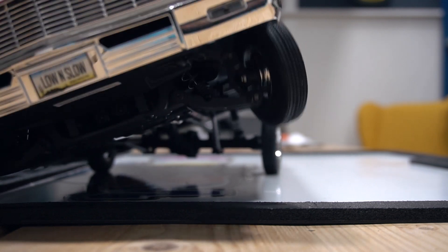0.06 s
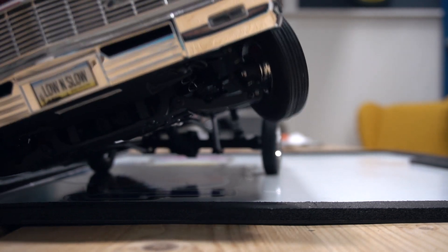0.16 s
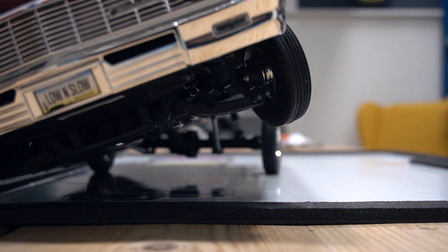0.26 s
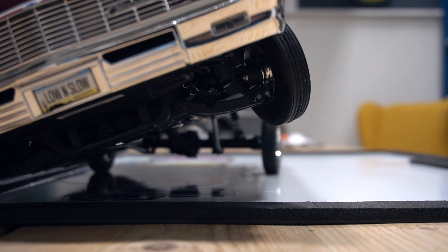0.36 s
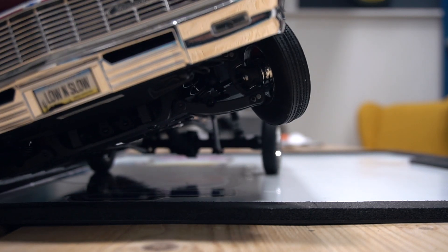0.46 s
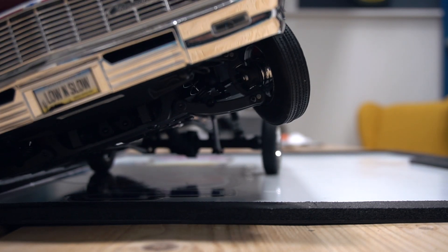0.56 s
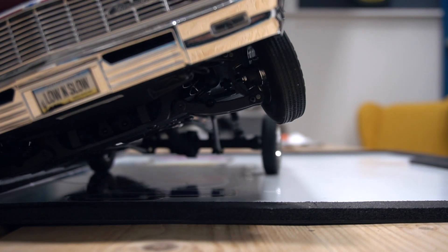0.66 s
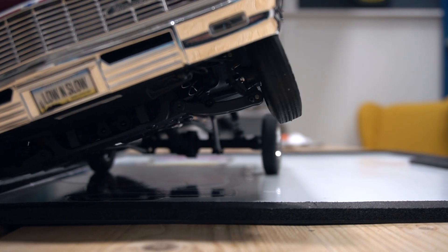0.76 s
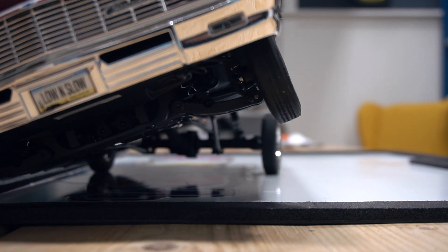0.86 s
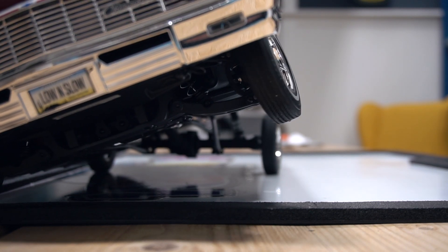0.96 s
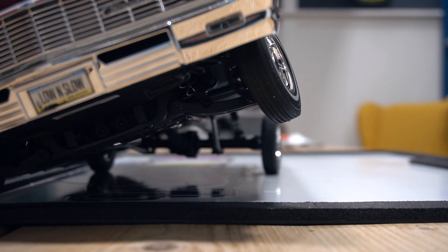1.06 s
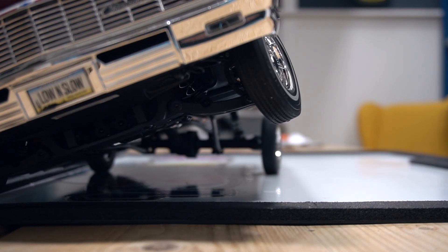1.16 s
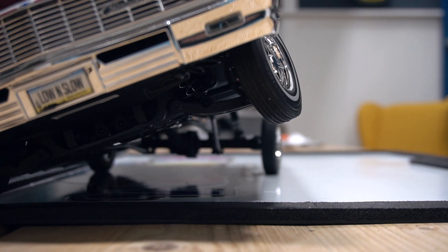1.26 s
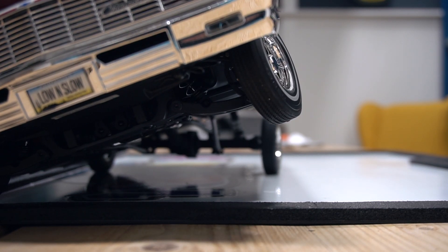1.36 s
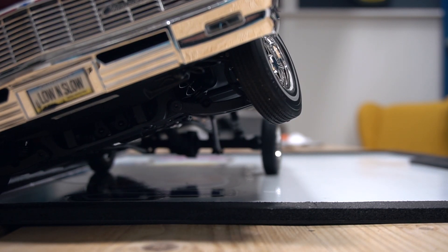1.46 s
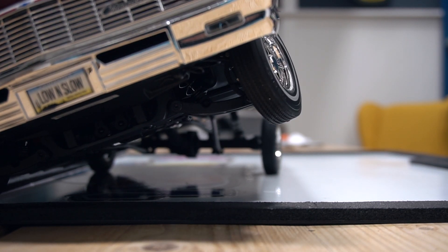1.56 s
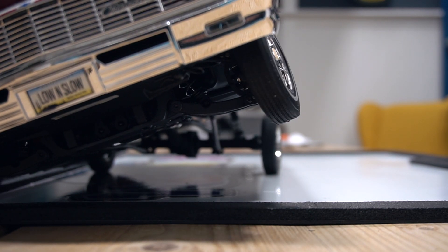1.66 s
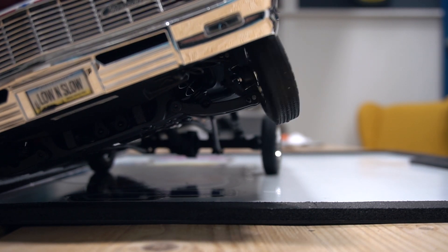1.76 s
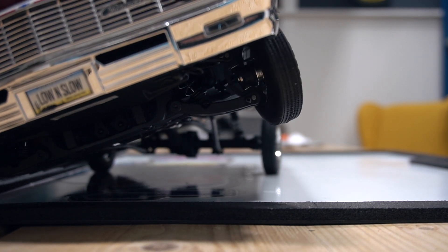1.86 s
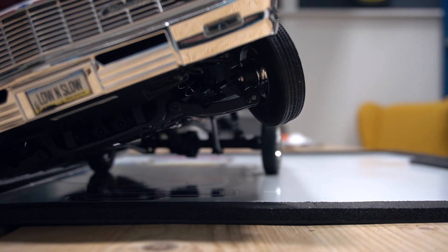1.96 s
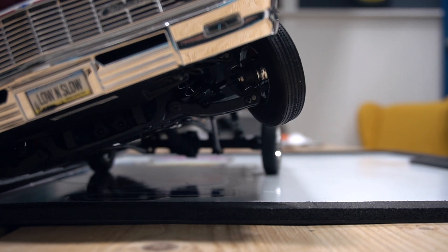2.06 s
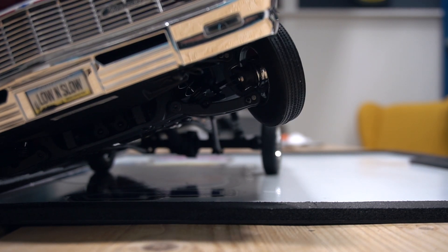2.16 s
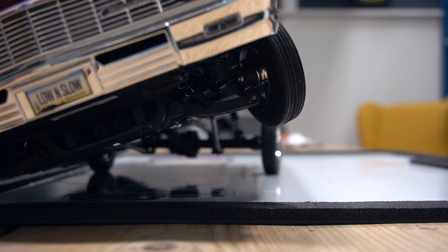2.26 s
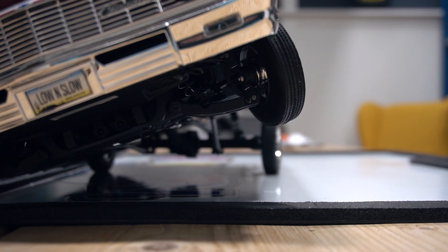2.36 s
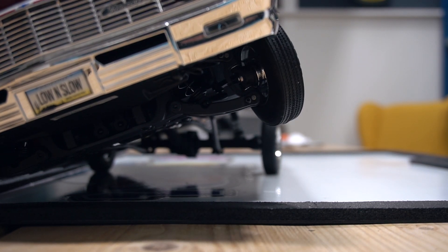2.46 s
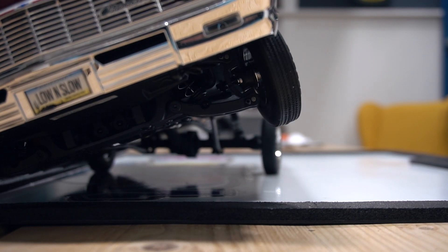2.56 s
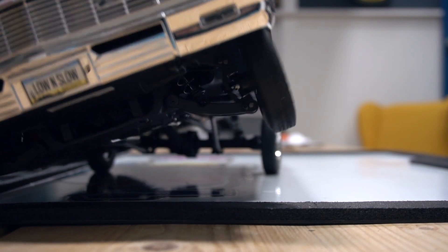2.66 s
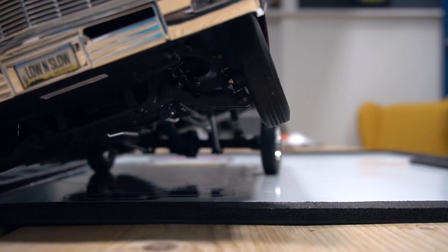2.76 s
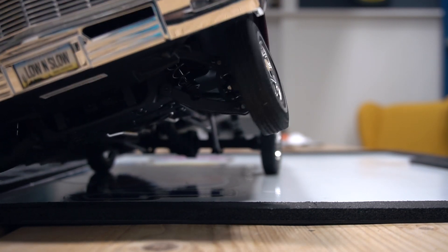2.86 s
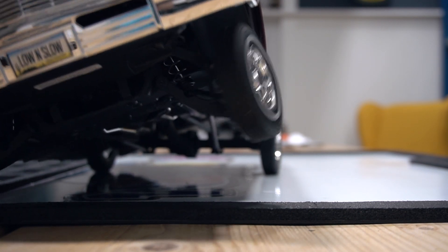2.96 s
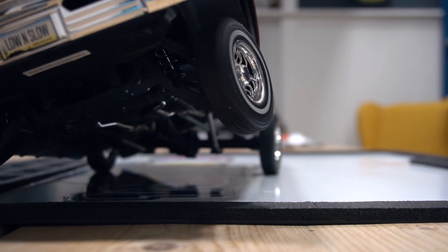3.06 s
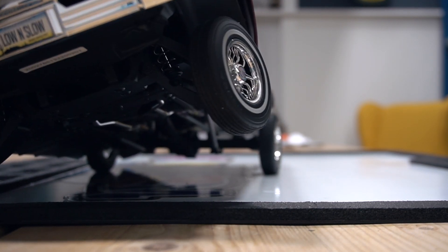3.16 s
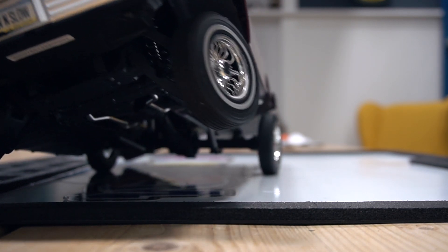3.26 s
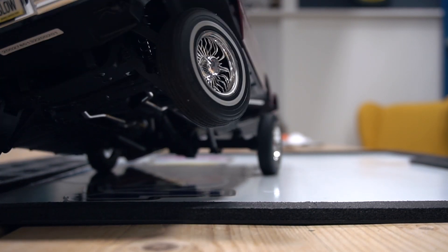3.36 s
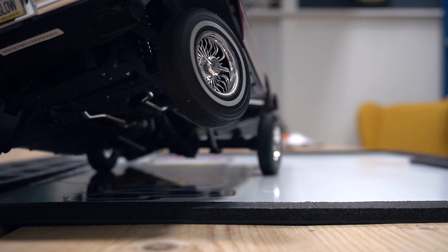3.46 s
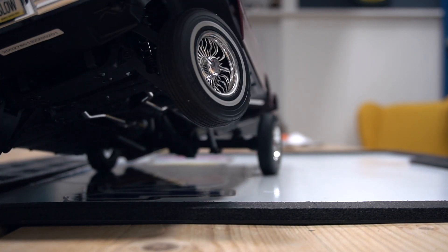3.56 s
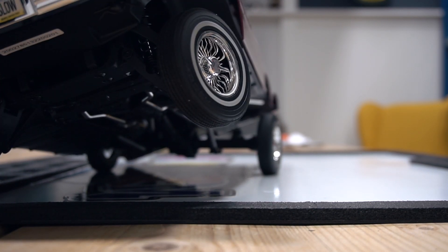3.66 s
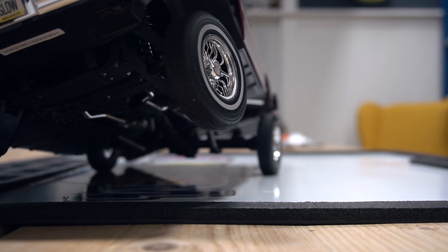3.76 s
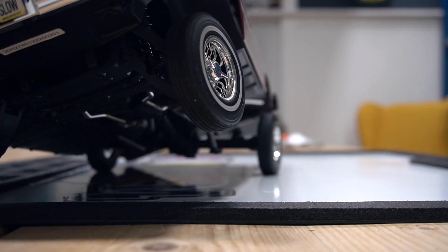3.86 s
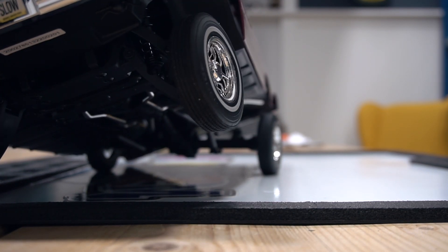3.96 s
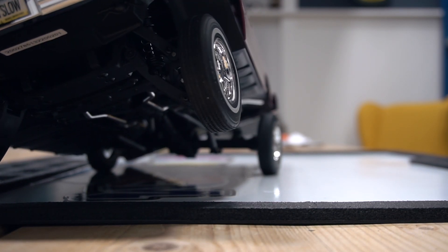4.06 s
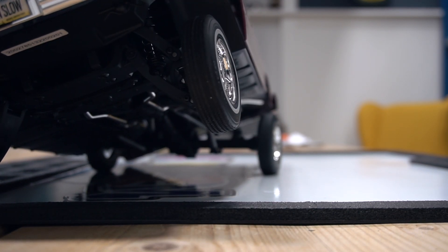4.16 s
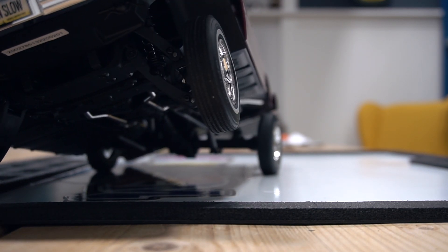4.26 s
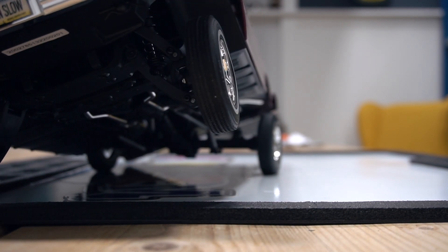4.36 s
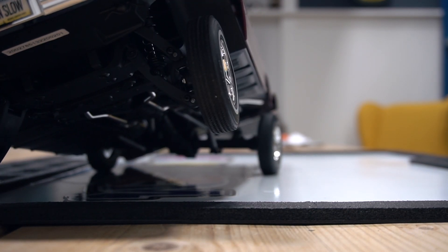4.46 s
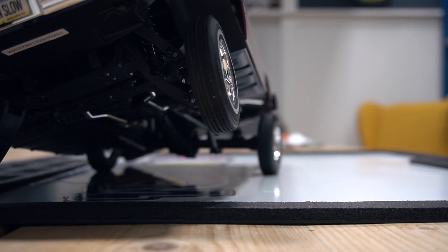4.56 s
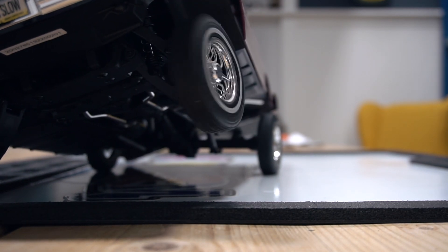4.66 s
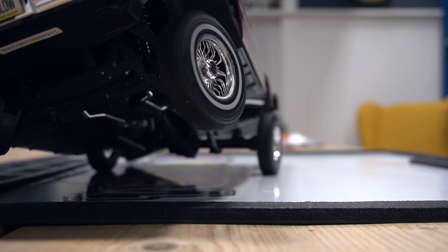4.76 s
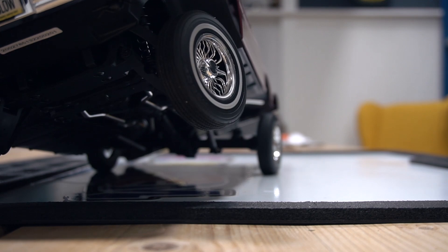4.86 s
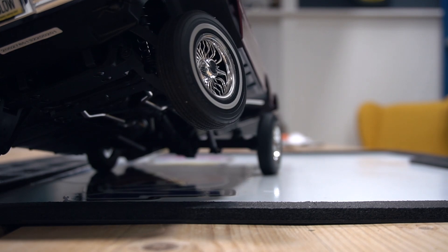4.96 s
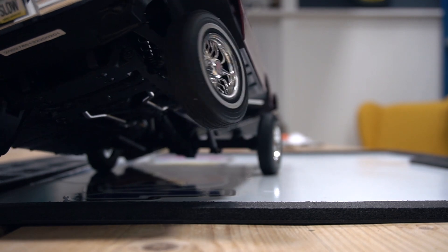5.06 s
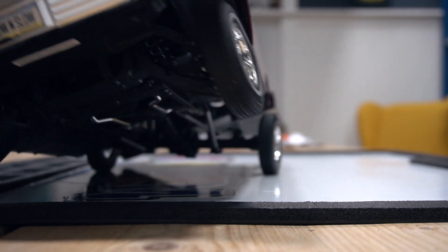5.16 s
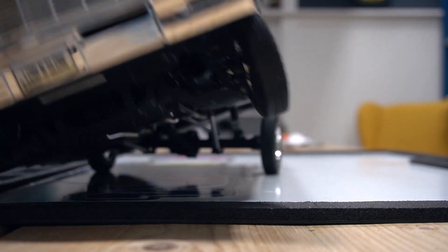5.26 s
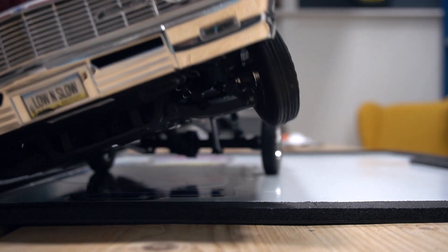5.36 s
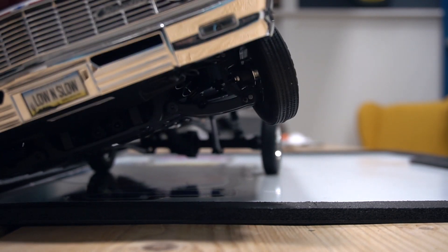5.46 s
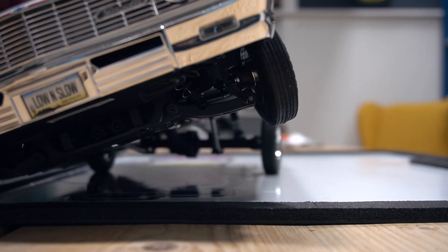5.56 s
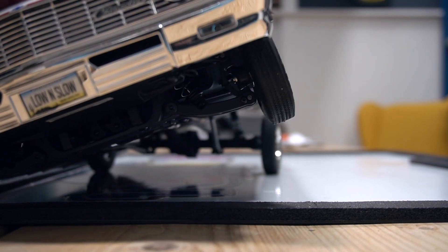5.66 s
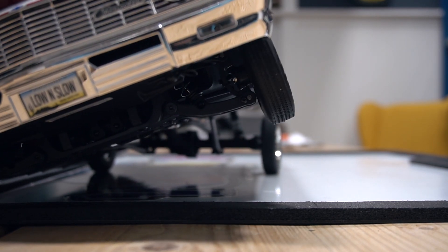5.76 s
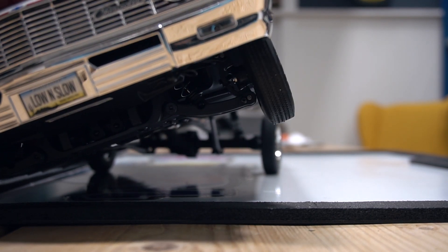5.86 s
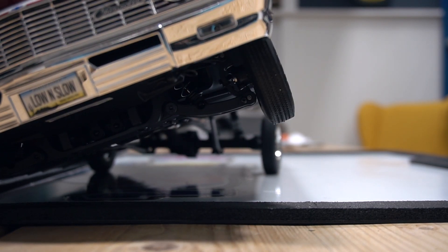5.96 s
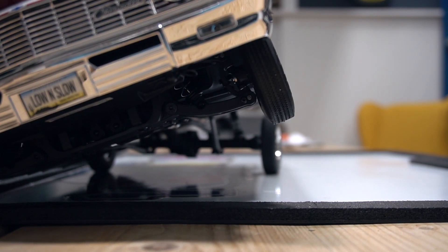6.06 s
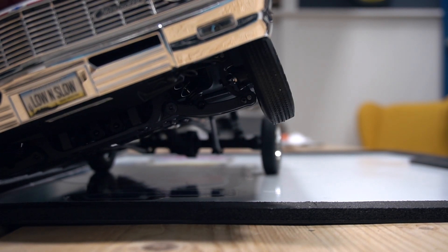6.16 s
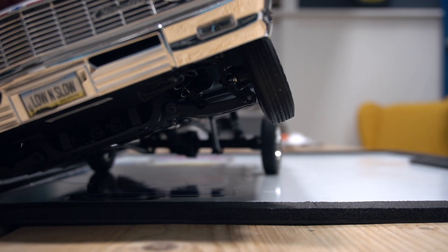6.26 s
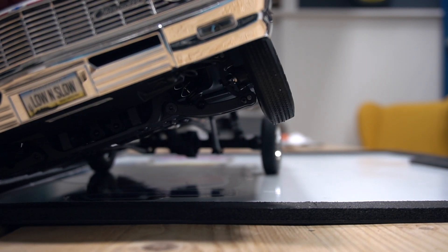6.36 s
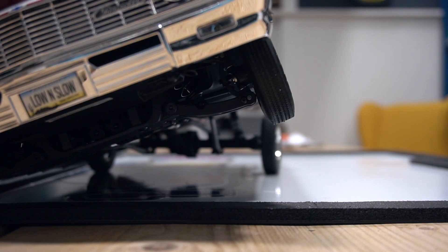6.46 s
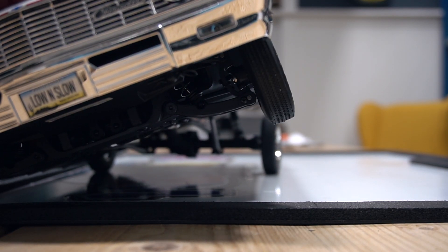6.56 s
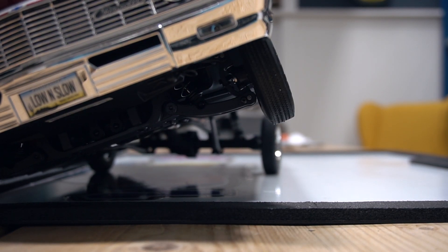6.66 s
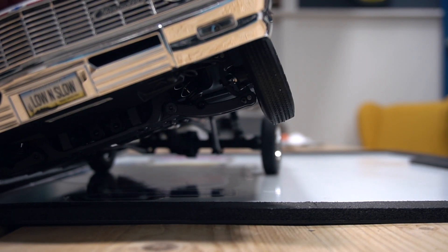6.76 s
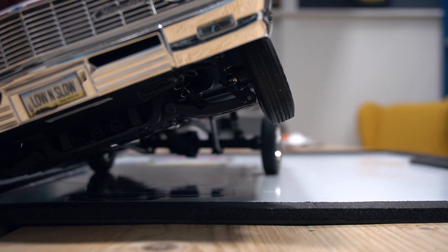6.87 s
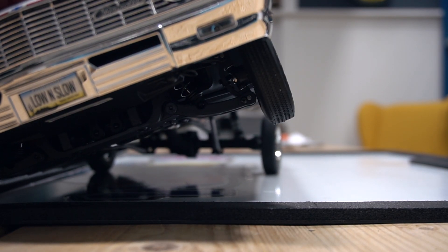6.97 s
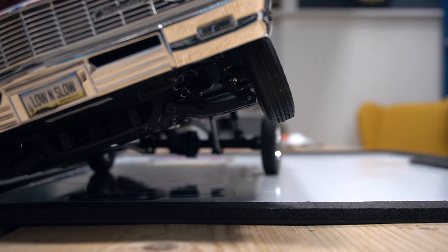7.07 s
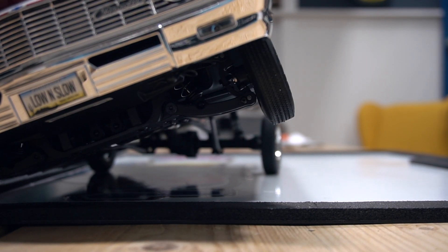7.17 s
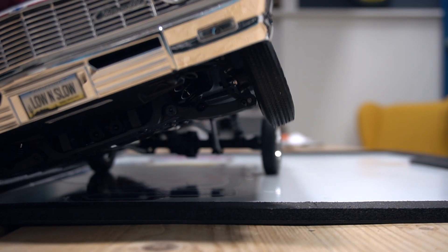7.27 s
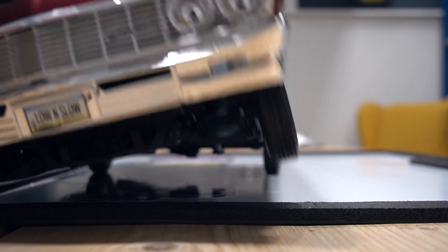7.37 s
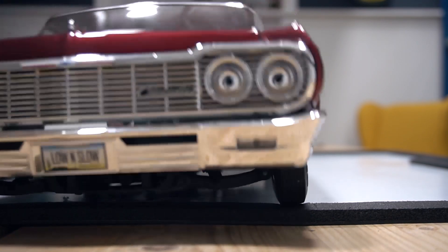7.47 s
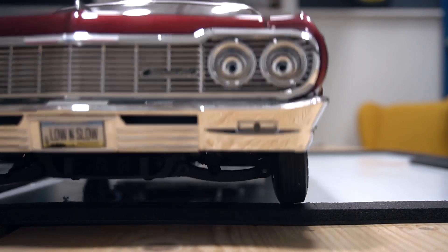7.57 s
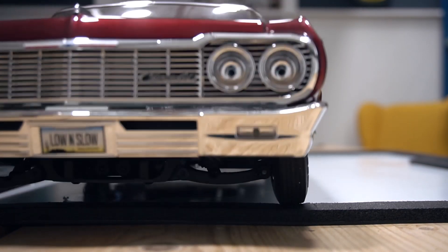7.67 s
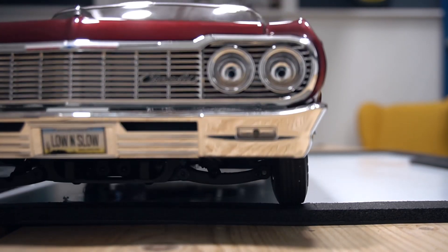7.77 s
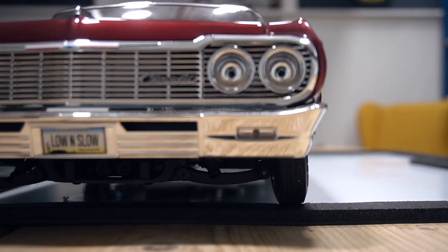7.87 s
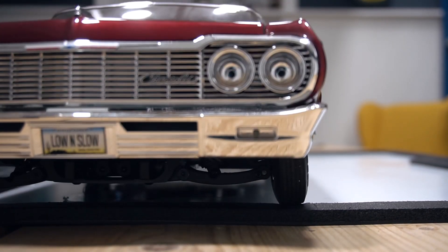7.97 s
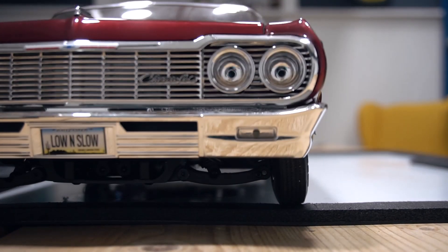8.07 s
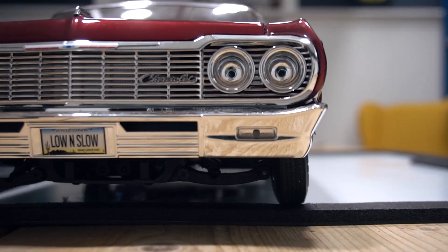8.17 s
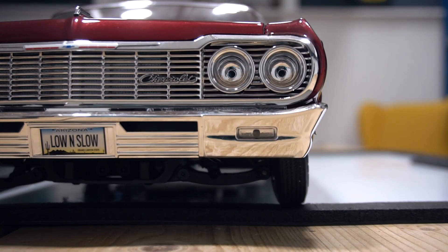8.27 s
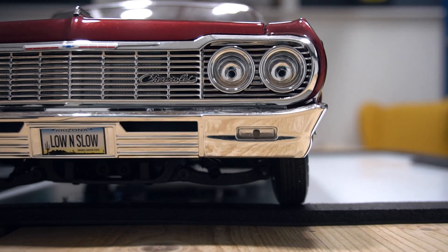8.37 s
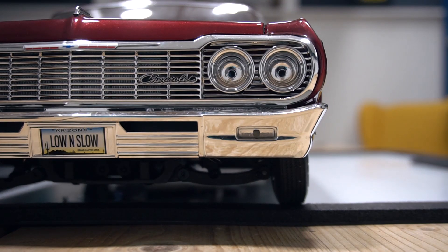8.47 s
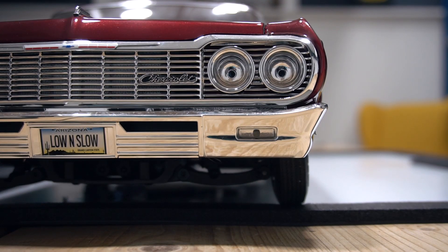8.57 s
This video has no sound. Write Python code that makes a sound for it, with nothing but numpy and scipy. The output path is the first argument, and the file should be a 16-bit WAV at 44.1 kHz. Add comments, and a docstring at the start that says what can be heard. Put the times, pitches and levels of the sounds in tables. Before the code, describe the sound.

Small servos buzz dryly and whir in short bursts as a model car tilts and knocks, then a rising gear whine drops it.

```python
"""A dry fifty-a-second buzz, short gear whirs, plastic knocks and a last rising whine: a model lowrider car
tilts, steers and drops on a workbench, close to a stereo microphone in a small room.
Servos buzz as control frames kick their loaded motors; bursts of gear teeth whir when they move.
The body knocks as ringing modes; at the end a sung gear-mesh note sets the car down, over a hush of air."""
import sys
import numpy as np
from scipy import signal
from scipy.fft import rfft, irfft
from scipy.io import wavfile
from scipy.ndimage import uniform_filter1d

SR = 44100
rng = np.random.default_rng(int(sys.argv[2]) if len(sys.argv) > 2 else 0)


def dump(signal):
    """Clip the signal to [-1, 1] and save it as 16-bit WAV at the path in sys.argv[1]."""
    limited = np.clip(np.atleast_2d(signal).T, -1, 1)
    pcm = np.round(limited * 32767).astype(np.int16)
    wavfile.write(sys.argv[1], SR, pcm)


N = 380141
TIME = np.arange(N) / SR

# Levels in the tables are relative: the layers and the room scale them further.
# Colour of the room's hush. Each row: frequency in Hz, spectrum level in dB.
AIR_COLOUR = [(30, -29.5), (110, -23), (200, -21), (340, -3), (480, -3.5), (1050, -8), (1600, -3.5),
              (2050, -3.5), (2400, -10), (4400, -7), (4900, -13.5), (15500, -18)]
# Reverberation of the room. Each row: frequency in Hz, time to fall 60 dB in seconds.
ROOM_DECAY = [(450, 0.55), (1200, 0.33), (3000, 0.36), (7000, 0.36), (15000, 0.2)]
# Likeness of the sound at the two microphones. Each row: frequency in Hz, correlation from 0 to 1.
MIC_LIKENESS = [(300, 1), (1000, 0.6), (2000, 0.65), (4000, .15)]
# Faint high whistle once the car is down. Each row: time in seconds, pitch in Hz, level in dB.
WHISTLE_PATH = [(7.71, 12480, -59.5), (7.765, 13550, -59), (7.85, 13100, -59), (7.969, 14020, -56.5),
                (8.09, 13300, -57.5), (8.4, 10700, -74)]
# The car's weight thudding into the bench. Each row: start in seconds, level in dB.
THUD_TIMES = [(5.36, -50), (5.421, -51.5), (7.513, -45)]
# Colour of a thud. Each row: frequency in Hz, spectrum level in dB.
THUD_COLOUR = [(42, -30.0), (75, -4), (300, -0.5), (1200, -56)]
# Sharp clicks of the linkage. Each row: start in seconds, level in dB.
CLICK_TIMES = [(0.222, -16.5), (1.776, -19.5), (2.692, -28), (5.419, -14), (7.463, -26)]
# Colour of a click. Each row: frequency in Hz, spectrum level in dB.
CLICK_COLOUR = [(100, -58), (1200, 19), (15000, -3.0)]
# The chassis knocking and landing: the place of a blow favours some modes, a hard blow rings them all.
# Each row: start in seconds, level in dB, favoured frequency in Hz, hardness in dB.
CHASSIS_BLOWS = [(0.019, -28.5, 285, -16), (.222, -30.5, 316, -4), (.69, -44, 370, -16),
                 (.888, -36, 398, -11), (1.603, -44, 458, -0.5), (1.669, -35, 500, -6),
                 (1.852, -33, 330, -11), (2.605, -29.5, 420, -0.5), (3.264, -24, 564, -3.5),
                 (4.14, -25, 537, -8.5), (5.325, -32, 380, 0), (5.403, -26, 270, -9),
                 (5.418, -23, 540, -2.5), (5.43, -26, 457, -5), (5.676, -30.5, 474, -24),
                 (7.311, -28, 1750, 0), (7.38, -23.5, 574, -9), (7.508, -15, 268, -25),
                 (7.57, -27, 660, 1.5), (7.626, -32, 600, -4.5)]
# Modes of the chassis. Each row: frequency in Hz, level in dB, time to fall 60 dB in seconds.
CHASSIS_MODES = [(271, -8.5, 0.14), (353.8, -7.5, 0.21), (434.7, -1, 0.19), (484, -2.5, 0.14),
                 (562.3, 1, 0.12), (623, 0.5, 0.11), (787, 1.5, 0.081), (1152, -0.5, 0.093),
                 (1320, -6, 0.053), (1770, -15, .08), (2100, -9, 0.046), (2780, -4, 0.072)]
# Colour of the loose parts that a knock shakes. Each row: frequency in Hz, spectrum level in dB.
LOOSE_COLOUR = [(60, -44), (200, -17), (450, -1.5), (1200, -3), (2400, -8.5), (8000, -42)]
# Colour of the shaken chassis. Each row: frequency in Hz, spectrum level in dB.
RATTLE_COLOUR = [(25, -78), (60, -44), (130, -26), (195, -15.5), (245, -4), (420, 0.5), (600, -4),
                 (950, -7), (1400, -6), (2500, -17.5), (8000, -42)]
# Gear squeals under sudden load.
# Each row: start in seconds, length in seconds, first pitch in Hz, last pitch in Hz, level in dB.
SQUEAL_CHIRPS = [(5.095, 0.015, 3465, 4110, -16.5), (5.111, 0.014, 3544, 3850, -21.5),
                 (5.168, 0.0126, 3480, 4290, -16.5), (7.331, 0.029, 5950, 6140, -22)]
# Stretches in which the servos strain to hold the car up.
# Each row: start in seconds, end in seconds, buzz level in dB.
HOLD_STRETCHES = [(0.527, 1.441, -46.5), (1.475, 2.142, -47.5), (2.338, 3.653, -44), (3.746, 4.517, -44.5),
                  (4.573, 5.898, -44)]
# Frames in which a servo kicks hard. Each row: start in seconds, level in dB.
HARD_KICKS = [(0.22, -32.5), (.516, -42.5), (0.6, -35.5), (1.603, -38.5), (1.661, -32.5), (3.498, -34.5),
              (4.555, -34.5), (5.896, -44)]
# Colour of the gear ticks. Each row: frequency in Hz, spectrum level in dB.
TICK_COLOUR = [(300, -30.5), (1300, -12.5), (1800, -3), (2550, -2), (4100, -3), (5450, -11.5), (6100, -5),
               (7500, -16), (15800, -21)]
# Rings of the servo gears at each tick. Each row: frequency in Hz, spread from tick to tick as a share,
# level at rest in dB, level with the corner lifted in dB.
TICK_RINGS = [(2475, 0.132, -5.5, -6.5), (4486, 0.031, -17, -6.5)]
# Flicks of the steering servo. Each row: start in seconds, length in seconds, gear whir level in dB.
STEER_MOVES = [(0.599, 0.046, -44), (0.677, 0.034, -37), (0.779, 0.046, -36), (0.877, 0.039, -42.5),
               (0.998, 0.041, -36.5), (1.297, 0.019, -43), (1.659, 0.055, -42), (1.74, 0.037, -33.5),
               (1.799, 0.045, -34), (1.878, 0.024, -37), (1.977, 0.026, -35), (2.58, 0.032, -36),
               (2.661, 0.089, -39.5), (3.734, 0.075, -37), (3.976, 0.026, -43.5), (4.057, 0.058, -39.5),
               (4.68, 0.086, -32.5), (5.617, 0.025, -42.5), (5.695, 0.044, -38)]
# Pushes of the lift servos. Each row: start in seconds, length in seconds, gear whir level in dB.
LIFT_MOVES = [(0.05, 0.012, -45.5), (0.121, 0.02, -42.5), (0.187, 0.03, -42), (2.926, 0.023, -42.5),
              (3.001, 0.058, -43), (3.158, 0.046, -43.5), (3.238, 0.048, -38), (3.303, 0.046, -36.5),
              (3.377, 0.056, -40), (5.076, 0.027, -36), (5.1, 0.018, -26), (5.163, 0.026, -24),
              (5.263, 0.025, -30), (5.292, 0.075, -39)]
# Colour of the steering gears. Each row: frequency in Hz, spectrum level in dB.
STEER_COLOUR = [(600, -41), (1200, -19), (1850, 2), (3800, -1.5), (5300, -4), (8600, -0.5), (11800, -4),
                (13200, -1), (15800, -11)]
# Colour of the lift gears. Each row: frequency in Hz, spectrum level in dB.
LIFT_COLOUR = [(600, -41), (1200, -17), (1850, -2), (2900, -7.5), (4100, 2.5), (5600, -2), (7000, -4.5),
               (9300, -3), (11500, -12), (14000, -11), (15800, -24)]
# Motor speed in the long run. Each row: time in seconds, gear mesh pitch in Hz.
RUN_MESH = [(7.31, 1605), (7.324, 1671), (7.356, 2376), (7.378, 2698), (7.398, 2796), (7.52, 3229),
            (7.575, 3197)]
# Further tones of the motor shaft in that run. Each row: multiple of the shaft speed, level in dB.
SHAFT_TONES = [(2, -12), (3, -17), (19, -10), (20, -14), (21, -12), (30, -14)]
# Body resonances that the rising tones sweep through. Each row: centre in Hz, width in Hz, boost in dB.
SHELL_RESONANCES = [(3140, 45, 12), (6000, 150, 0), (6500, 160, 2), (9300, 450, 5)]
# Colour of the gears grinding at full speed. Each row: frequency in Hz, spectrum level in dB.
GRIND_COLOUR = [(100, -62), (600, -31), (1100, -9), (1650, 2.5), (2030, -9), (2600, 5.5), (4100, -0.5),
                (4650, 4.5), (5100, 1.5), (6150, 3), (7000, -1.5), (12500, -2.5), (15800, -9)]

AIR_DB, EDGE_HZ = -59, 15900
# control frames of the servos, and teeth on the motor's pinion
FRAME_HZ, FRAME_START_S, PINION_TEETH = 50, .0155, 10
# a harder move shakes the chassis harder: rattle level at a usual whir level, and dB of rattle per dB of whir
USUAL_WHIR_DB, RATTLE_DB, RATTLE_SLOPE = -39, -45, 0.63
# while the front corner is lifted high, the moves shake the chassis less
LIFTED_FROM_S, LIFTED_TO_S, LIFTED_DB = 3.1, 5.06, -5.5
# the buzz builds as the load comes on, then eases
LOAD_S, SLACK_DB, RELAX_DB_PER_S = 0.078, -3.5, -1
# the long run that lowers the car: the motor spins up, is cut, and the gears run out
RUN_FROM_S, RUN_TO_S, RUN_ATTACK_S, RUN_OUT_S = 7.303, 7.594, 0.012, 0.0074
RUN_WHIR_DB, RUN_WHINE_DB = -22, -24.5
# the note fades as the tyres take the weight
UNLOAD_FROM_S, UNLOAD_DB_PER_S = 7.54, -110


def gain_of(db):
    """Decibels to amplitude."""
    return 10 ** (np.asarray(db) / 20)


def evened(x):
    """Scales to rms 1."""
    return x / np.sqrt(np.mean(x ** 2) + 1e-20)


def read(points, hz):
    """Reads a table on a log-frequency axis."""
    f, value = np.transpose(points)
    return np.interp(np.log(hz + 1), np.log(f + 1), value)


def add(mix, s, sound):
    """Mixes a sound in at time s, in seconds."""
    part = mix[max(round(s * SR), 0):][:len(sound)]
    part += sound[:len(part)]


def wander(hz, size):
    """A random line of rms 1 that takes a new course hz times a second."""
    knots = rng.standard_normal(size)
    return evened(np.interp(np.arange(size) * hz / SR, np.arange(size), knots))


def coloured(x, points, size=2048):
    """Passes x through a causal, minimum-phase filter of energy 1 with the given spectrum."""
    log_gain = np.log(gain_of(read(points, abs(np.fft.fftfreq(size, 1 / SR)))))
    minimum_phase = np.exp(np.conj(signal.hilbert(log_gain)))
    ring = np.fft.ifft(minimum_phase).real[:size // 2]
    return signal.oaconvolve(x, ring / np.linalg.norm(ring))[:len(x)]


def patchy(x, depth_db):
    """Lets narrow bands swell and sink on their own for some tens of milliseconds."""
    z = signal.stft(x)[2]
    patches = uniform_filter1d(rng.standard_normal(z.shape), size=4, axis=0)
    patches = uniform_filter1d(patches, size=10, axis=1)
    return signal.istft(z * evened(gain_of(depth_db * evened(patches))))[1][:len(x)]


def pair(size):
    """Short-time spectra of the noise that two close microphones share, more so in the bass."""
    hz, t, (mid, side) = signal.stft(rng.standard_normal((2, size)), SR, nperseg=512)
    alike = np.clip(read(MIC_LIKENESS, hz), -1, 1)[:, None]
    mid = mid * np.sqrt((1 + alike) / 2)
    side = side * np.sqrt((1 - alike) / 2)
    return hz, t, np.array([mid + side, mid - side])


def room(x, side_db, tail_db, early_s=0.0024):
    """The direct sound, quick scatter off the bench that differs at each microphone, and the room's tail."""
    hz, t, z = pair(SR // 2)
    fall = gain_of(-60 * t / read(ROOM_DECAY, hz)[:, None])
    tail = signal.istft(z * fall, SR, nperseg=512)[1]
    t = np.arange(tail.shape[1]) / SR
    tail = tail * (1 - np.exp(-t / 0.00045))
    scatter = rfft(rng.standard_normal(len(t)) * np.exp(-t / early_s))
    alike = np.clip(read(MIC_LIKENESS, np.fft.rfftfreq(len(t), 1 / SR)), 0, 1)
    # only the phase of the scatter counts; its level follows how unlike the two sides are
    side = irfft(scatter / abs(scatter) * np.sqrt((1 - alike) / (1 + alike))) * (t < t[-1] / 2)
    echoes = gain_of(side_db) * np.array([side, -side]) + gain_of(tail_db) * tail / np.linalg.norm(tail[0])
    return gain_of(-2.5) * (x + signal.fftconvolve(x[None], echoes, axes=1)[:, :N])


def air(line_hz=3140, line_db=-77):
    """The steady hush of the room, with a faint unsteady tone in it."""
    hush = signal.istft(pair(N)[2], SR, nperseg=512)[1][:, :N]
    hush = evened(np.array([coloured(side, AIR_COLOUR, size=8192) for side in hush]))
    line = gain_of(line_db) * wander(39, N) * np.sqrt(2) * np.sin(2 * np.pi * line_hz * TIME)
    return gain_of(AIR_DB) * hush + line


def whistle():
    """A thin, wavering high tone."""
    s, hz, db = np.transpose(WHISTLE_PATH)
    turns = np.cumsum(np.interp(TIME, s, hz) * (1 + 0.0079 * wander(150, N))) / SR
    sounding = (TIME > s[0]) & (TIME < s[-1])
    return gain_of(np.interp(TIME, s, db)) * sounding * np.sin(2 * np.pi * turns)


def thuds(decay_s=0.0315):
    """Rubber tyres push into the bench: a soft low thump of decaying noise."""
    t, out = np.arange(SR // 3) / SR, np.zeros(N)
    for s, db in THUD_TIMES:
        add(out, s, gain_of(db) * rng.standard_normal(len(t)) * np.exp(-t / decay_s))
    return coloured(out, THUD_COLOUR)


def clicks(decay_s=0.0044):
    """Metal links snap over: a bright crack of a few milliseconds."""
    t, out = np.arange(SR // 50) / SR, np.zeros(N)
    for s, db in CLICK_TIMES:
        add(out, s, gain_of(db - 7.5) * rng.standard_normal(len(t)) * np.exp(-t / decay_s))
    return coloured(out, CLICK_COLOUR)


def teeth(per_s, spread_db):
    """Gear teeth striking: dense clicks of uneven size, rms 1."""
    size = gain_of(spread_db * np.minimum(rng.exponential(1, N), 4))
    return evened(size * rng.choice([-1., 1.], N) * (rng.random(N) < per_s / SR))


def knocks(bounce_s=0.00894, bounce_db=-7, scatter_db=1.5, loose_db=2, settle_s=0.015,
           favour_octaves=0.31, contact_s=0.00036):
    """Each blow rings the chassis modes, bounces once, and sets loose parts rattling."""
    hz, db, t60 = np.transpose(CHASSIS_MODES)[:, :, None]
    t, (out, shake) = np.arange(SR // 3) / SR, np.zeros((2, N))
    push = 1 - np.exp(-t / contact_s)
    for s, blow_db, favoured_hz, hard_db in CHASSIS_BLOWS:
        add(shake, s, gain_of(blow_db + hard_db + loose_db) * push * np.exp(-t / settle_s))
        share = gain_of(hard_db) + np.exp(-(np.log2(hz / favoured_hz) / favour_octaves) ** 2)
        bounce_lag = bounce_s * rng.uniform(0.697, 1.268)
        for lag, drop_db in ((0, 0), (bounce_lag, bounce_db)):
            weight, detune = rng.standard_normal((2, len(hz), 1))
            fall = gain_of(db + scatter_db * weight - 60 * t / t60)
            modes = share * fall * np.sin(2 * np.pi * hz * (1 + 0.0069 * detune) * t)
            ringing = (modes * rng.choice([-1, 1], hz.shape)).sum(0)
            add(out, s + lag, gain_of(blow_db + drop_db - 6.0) * push * ringing)
    # a small shell gives no bass
    radiated = signal.sosfilt(signal.butter(4, 230, "high", fs=SR, output="sos"), out)
    return radiated + coloured(shake * teeth(2500, 0.6), LOOSE_COLOUR)


def squeals(rough=0.056):
    """Gears under sudden load give short rising chirps."""
    out = np.zeros(N)
    for s, length, first_hz, last_hz, db in SQUEAL_CHIRPS:
        size = int(length * SR)
        hz = np.linspace(first_hz, last_hz, size) * (1 + rough * wander(2430, size))
        angle = 2 * np.pi * np.cumsum(hz) / SR
        tone = evened(np.sin(angle) + 0.43 * np.sin(2 * angle))
        add(out, s, gain_of(db) * np.hanning(size) * tone)
    return out


def lifted(s):
    """True while the front corner is high in the air."""
    return (LIFTED_FROM_S < s) & (s < LIFTED_TO_S)


def effort():
    """Amplitude of the holding buzz: it builds up in each stretch and eases slowly."""
    out = np.zeros(N)
    for start, end, db in HOLD_STRETCHES:
        t = np.arange(0, end - start, 1 / SR)
        add(out, start, gain_of(db + SLACK_DB * np.exp(-t / LOAD_S) + RELAX_DB_PER_S * t))
    return uniform_filter1d(out, size=256)


def trembling(shake_db=-9, lifted_db=-5):
    """The strain of holding shakes the chassis a little too."""
    shake = gain_of(shake_db + lifted_db * lifted(TIME)) * effort()
    return coloured(shake * teeth(900, 3.5), RATTLE_COLOUR)


def holding(kick_s=0.0046, second_db=-2, uneven_db=4.5, tick_db=-2, ring_rise_s=0.00053, decay_s=0.0016):
    """Each control frame kicks two loaded motors briefly; the gears take up their slack with a tick and ring."""
    starts = np.arange(FRAME_START_S, N / SR, 1 / FRAME_HZ)
    hz, spread, rest_db, lifted_db = np.transpose(TICK_RINGS)[:, :, None]
    t, (ticks, rings) = np.arange(SR // 70) / SR, np.zeros((2, N))
    kick_shape = np.exp(-t / kick_s) * (1 - np.exp(-t / 0.00039))
    ring_shape = np.exp(-t / decay_s) * (1 - np.exp(-t / ring_rise_s))
    for lag, db in ((0, 0), (.0028, second_db)):  # the second motor is kicked a little later
        for s, (late, strength) in zip(starts, rng.standard_normal((len(starts), 2))):
            at = s + lag + .0005 * late
            size = gain_of(db + uneven_db * np.clip(strength, -2, 1))
            add(ticks, at, size * evened(rng.standard_normal(len(t)) * kick_shape))
            ring_hz = hz * (1 + spread * rng.standard_normal(hz.shape))
            modes = np.sin(2 * np.pi * ring_hz * t) * ring_shape
            level = gain_of(lifted_db if lifted(s) else rest_db)
            add(rings, at, size * (level * modes / modes.std(1, keepdims=True)).sum(0))
    strain = effort() / ticks.std()
    ticks = ticks * strain * gain_of(tick_db)
    for s, db in HARD_KICKS:
        add(ticks, s, gain_of(db + 4) * rng.standard_normal(len(t)) * np.exp(-t / 0.0053))
    return coloured(ticks, TICK_COLOUR) + rings * strain


def moving(moves, colour, spin_up_s=0.0028, coast_s=0.0089, whine_db=-9, lumpy_db=3.0,
           soft_hz=10000, hard_db=-37):
    """A motor spins up and coasts; its gears whir and whine, and shake the chassis."""
    whir, shake, whine = np.zeros((3, N))
    for (s, length, whir_db), (pitch, phase) in zip(moves, rng.random((len(moves), 2))):
        rattle_db = RATTLE_DB + RATTLE_SLOPE * (whir_db - USUAL_WHIR_DB) + LIFTED_DB * lifted(s)
        t = np.arange(0, length + 0.1, 1 / SR)
        speed = (1 - np.exp(-t / spin_up_s)) * np.exp(-np.maximum(t - length, 0) / coast_s)
        mesh_hz = (2300 + 600 * pitch) * (1 - .45 * np.exp(-t / .025))
        turns = np.cumsum(mesh_hz * (1 + 0.032 * wander(899, len(t)))) / SR
        tone = evened(sum(np.cos(2 * np.pi * k * (turns + phase)) for k in range(1, 6)))
        add(whir, s, gain_of(whir_db) * speed)
        add(whine, s, gain_of(whir_db + whine_db) * speed * tone)
        add(shake, s, gain_of(rattle_db) * speed)
    strikes = whir * teeth(9000, 1.44) * gain_of(lumpy_db * wander(350, N))
    gears = coloured(strikes + whine, colour)
    dull = signal.sosfiltfilt(signal.butter(2, soft_hz, fs=SR, output="sos"), gears)
    # faster teeth strike harder and brighter
    gears = dull + (gears - dull) * np.minimum(whir / gain_of(hard_db), 2)
    return gears + coloured(gain_of(1.5) * shake * teeth(900, 4.0), RATTLE_COLOUR)


def shell(hz):
    """How strongly the body radiates a tone of this pitch."""
    return 1 + sum(gain_of(db) / (1 + (2 * (hz - centre) / width) ** 2)
                   for centre, width, db in SHELL_RESONANCES)


def lowering(flutter=.006, rattle_db=-16, patchy_db=3.0, lumpy_db=1.0):
    """At full speed the gear mesh sings a rising, broken note with overtones, over the grinding of the teeth."""
    t = np.maximum(TIME - RUN_FROM_S, 0)
    mesh_hz = np.interp(TIME, *np.transpose(RUN_MESH))
    running = (1 - np.exp(-t / RUN_ATTACK_S)) * np.exp(-np.maximum(TIME - RUN_TO_S, 0) / RUN_OUT_S)
    load = gain_of(UNLOAD_DB_PER_S * np.maximum(TIME - UNLOAD_FROM_S, 0))
    shaft_hz = mesh_hz / PINION_TEETH
    shaft = 2 * np.pi * np.cumsum(shaft_hz * (1 + flutter * wander(700, N))) / SR
    wobble = 1 + 0.13 * np.cos(shaft)  # an off-centre pinion presses harder once a turn
    # uneven teeth roughen the note
    whine = shell(mesh_hz) * gain_of(RUN_WHINE_DB + 2.3 * wander(300, N)) * np.sin(PINION_TEETH * shaft)
    tones = np.zeros(N)
    for multiple, db in SHAFT_TONES:
        k = round(multiple)
        tones += shell(k * shaft_hz) * gain_of(db + 4.1 * wander(200, N)) * np.sin(k * shaft)
    speed = mesh_hz / mesh_hz.max()
    # the further tones grow faster with speed
    note = whine * wobble * speed ** 2 + tones * gain_of(RUN_WHIR_DB) * speed ** 3
    grind_level = gain_of(RUN_WHIR_DB + 1.5 + lumpy_db * wander(110, N))
    grind = coloured(grind_level * running * wobble * teeth(12000, 2.0), GRIND_COLOUR)
    rattle = coloured(gain_of(RUN_WHIR_DB + rattle_db) * running * teeth(320, 3.2), RATTLE_COLOUR)
    return note * load * running + patchy(grind, patchy_db) + rattle


def scene():
    """The servos sit a little to the left; the body is central."""
    body = room(knocks() + thuds(), side_db=-13.0, tail_db=-7.5)
    buzz = room(holding(), side_db=-4.5, tail_db=-4.5)
    moves = moving(STEER_MOVES, STEER_COLOUR) + moving(LIFT_MOVES, LIFT_COLOUR)
    action = room(moves + trembling() + squeals() + clicks(), side_db=-4.0, tail_db=-5.0)
    run = room(lowering() + whistle(), side_db=-5.0, tail_db=-5.0)
    return air() + body + (buzz + action + run) * gain_of([[.7], [-.7]])


def record(dry):
    """A steep low-pass closes the top of the band."""
    low_pass = signal.firwin(511, EDGE_HZ, window=("kaiser", 9), fs=SR)
    return signal.oaconvolve(dry, low_pass[None], "same")


dry = scene()
out = record(dry)
dump(out)
```